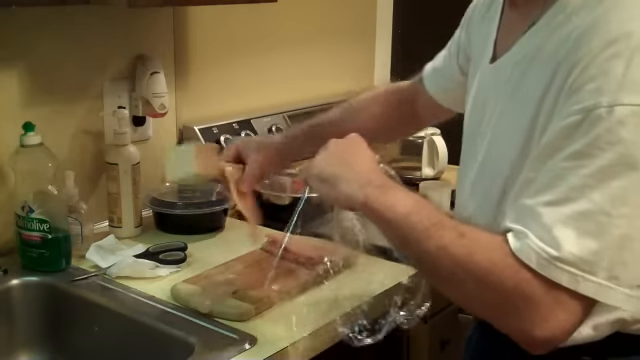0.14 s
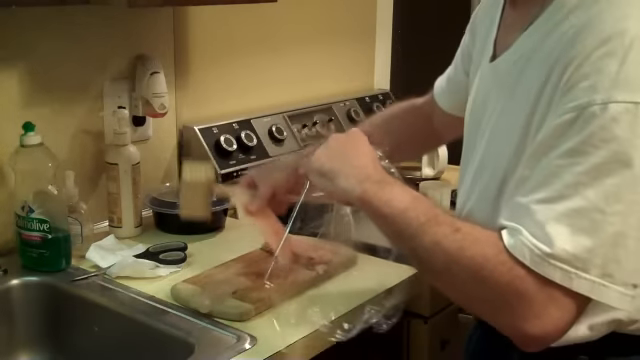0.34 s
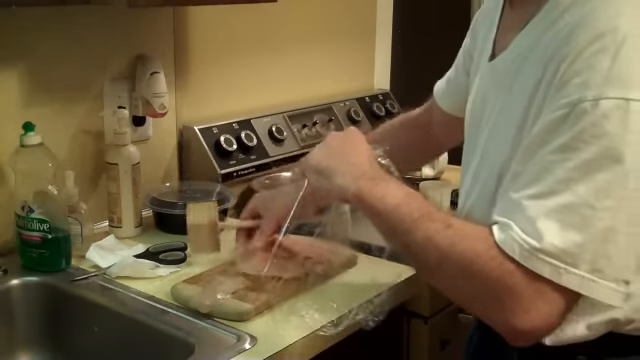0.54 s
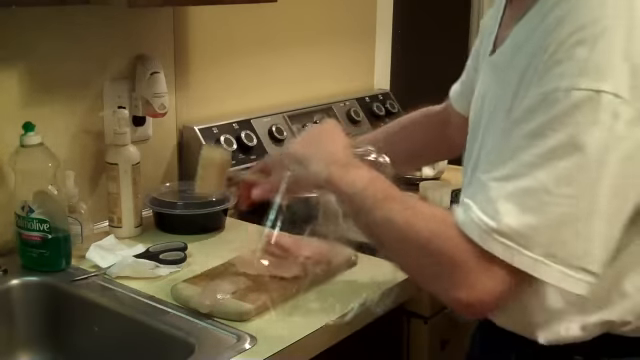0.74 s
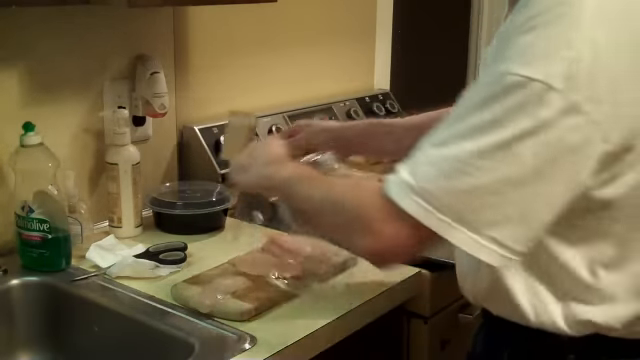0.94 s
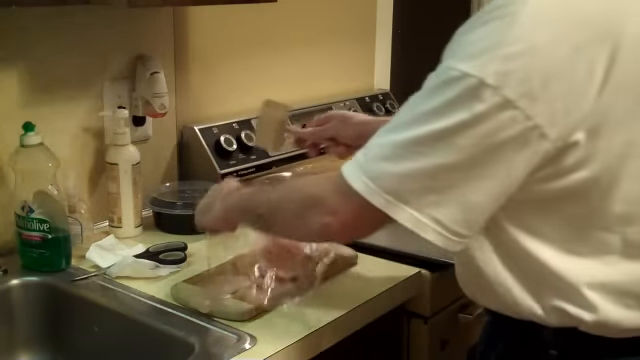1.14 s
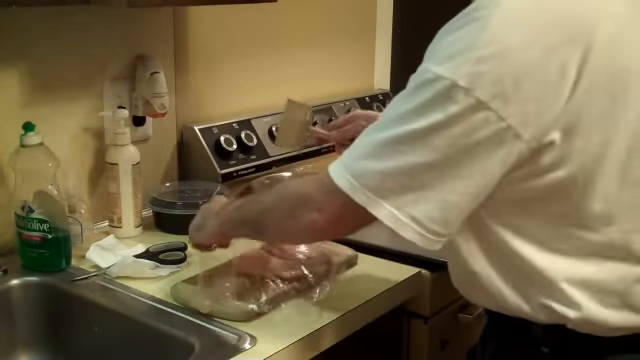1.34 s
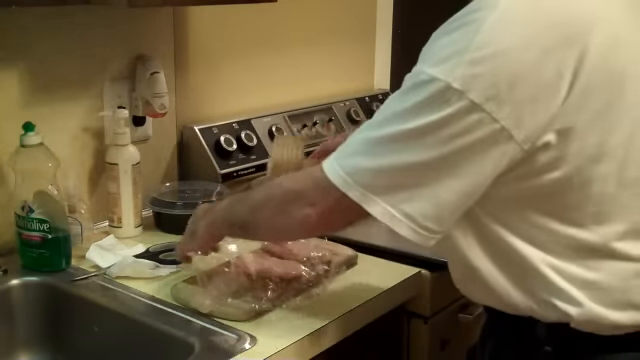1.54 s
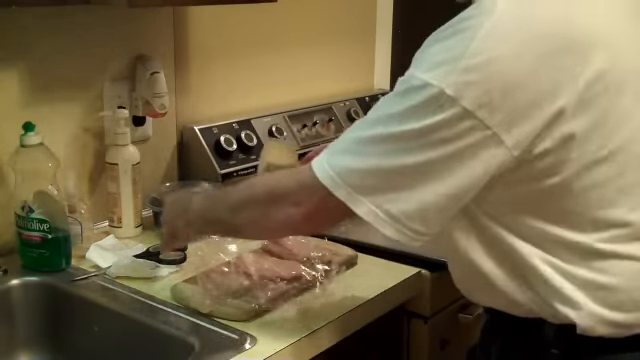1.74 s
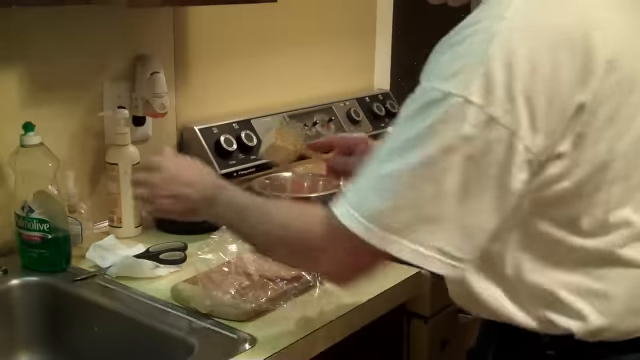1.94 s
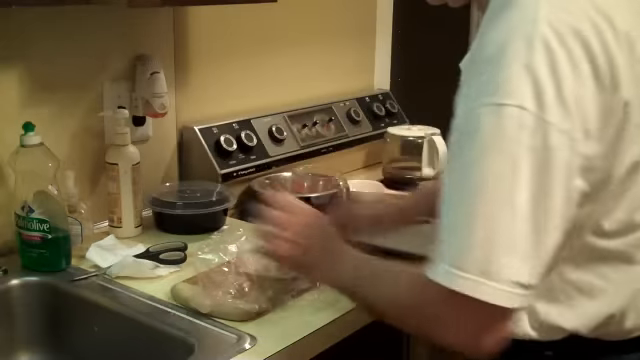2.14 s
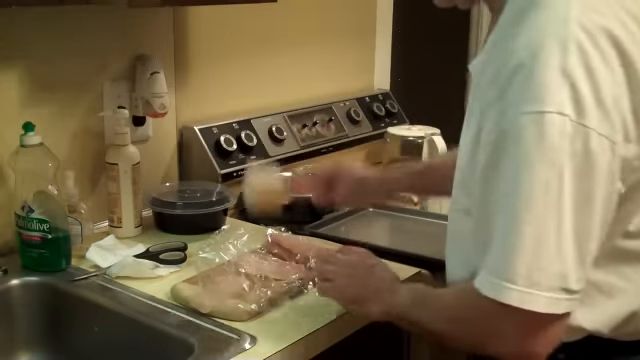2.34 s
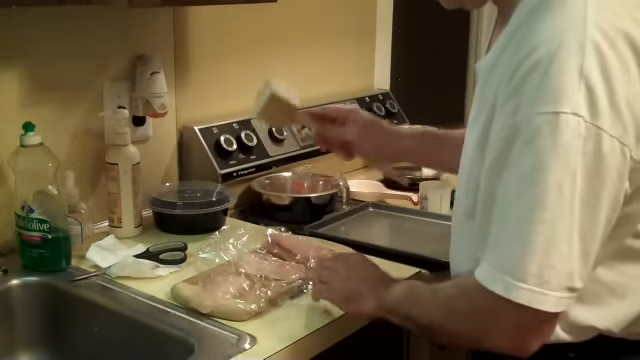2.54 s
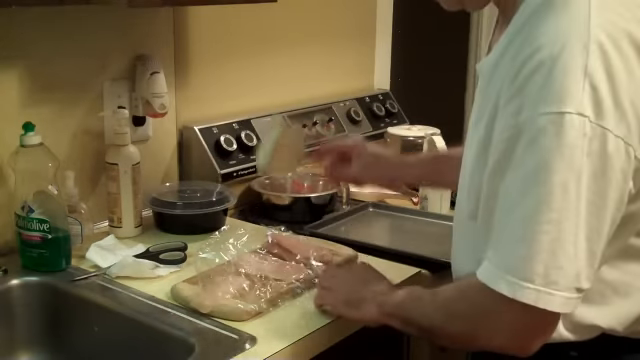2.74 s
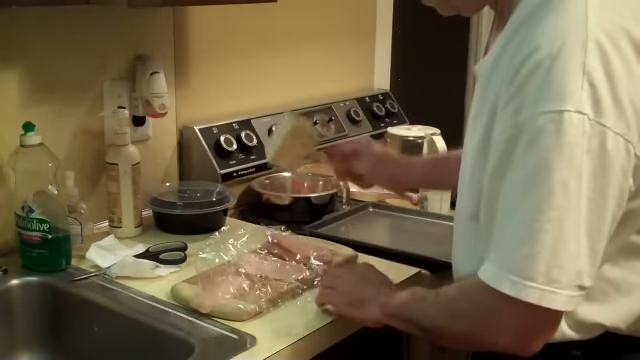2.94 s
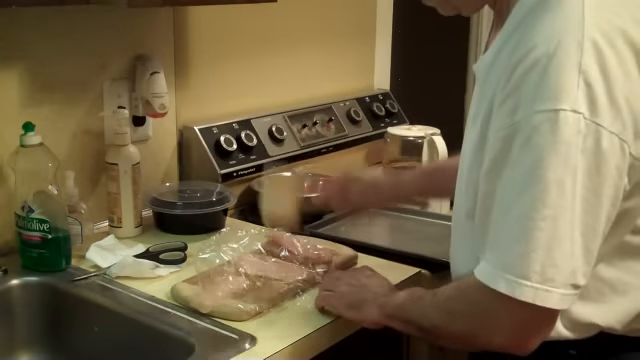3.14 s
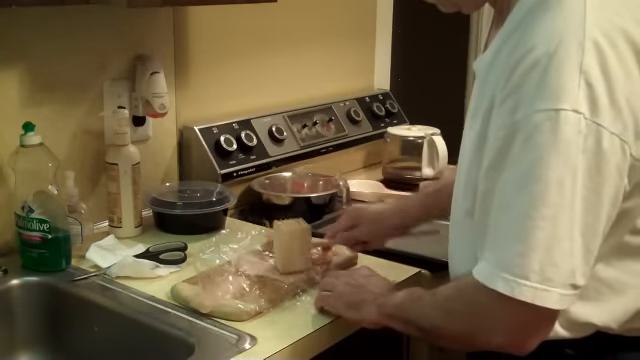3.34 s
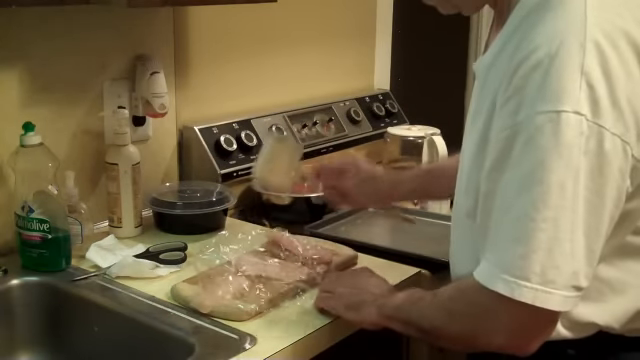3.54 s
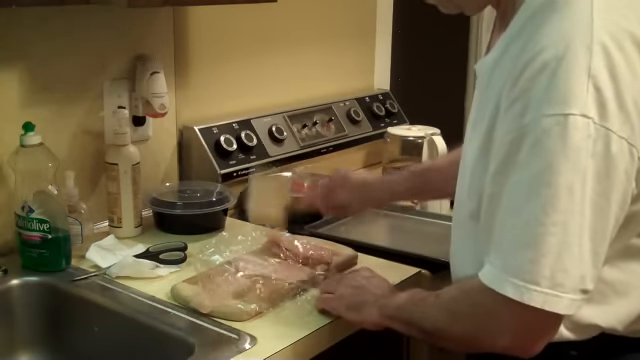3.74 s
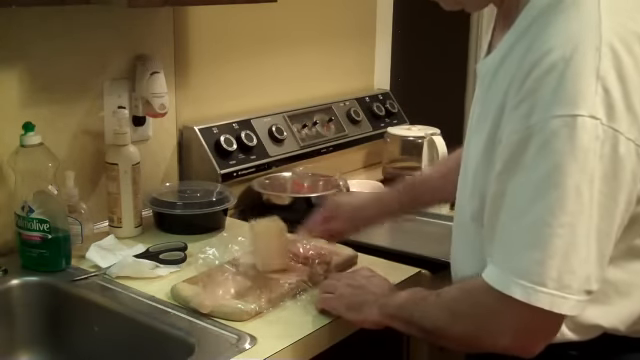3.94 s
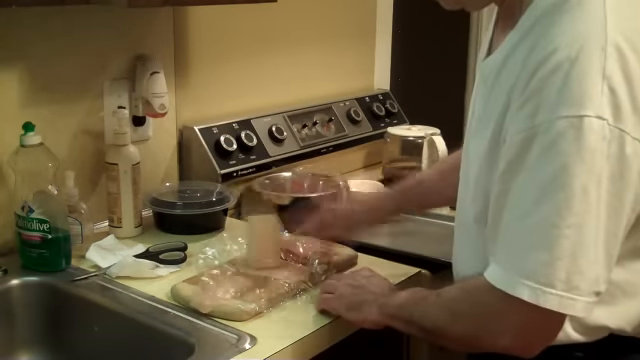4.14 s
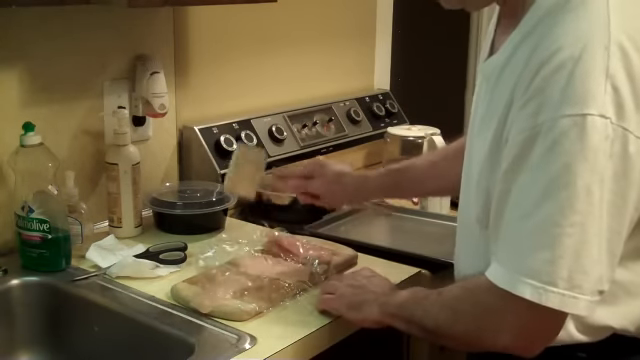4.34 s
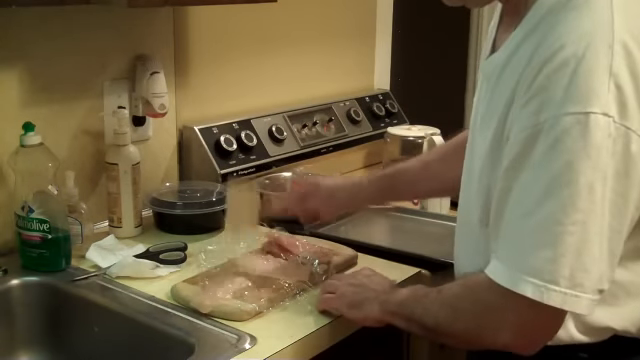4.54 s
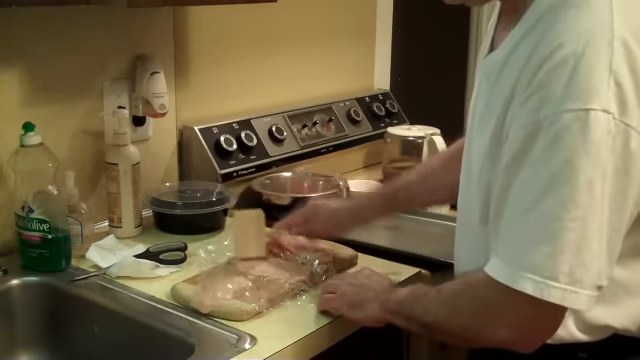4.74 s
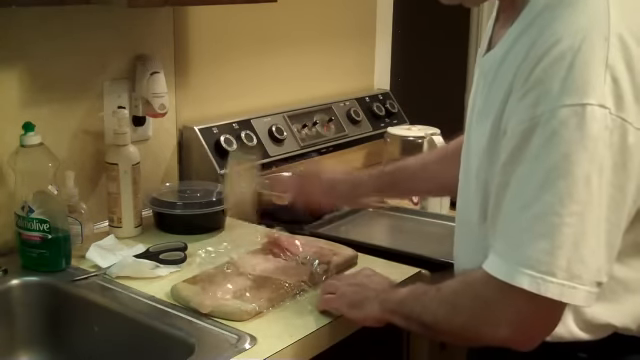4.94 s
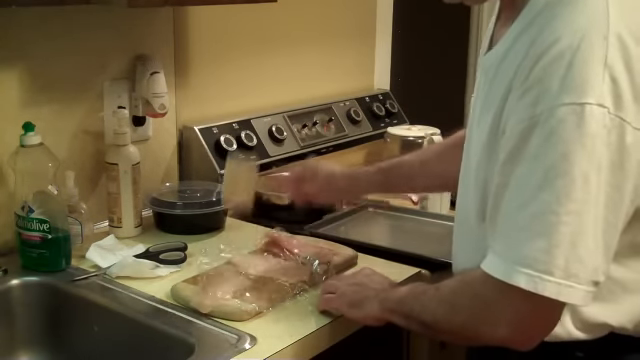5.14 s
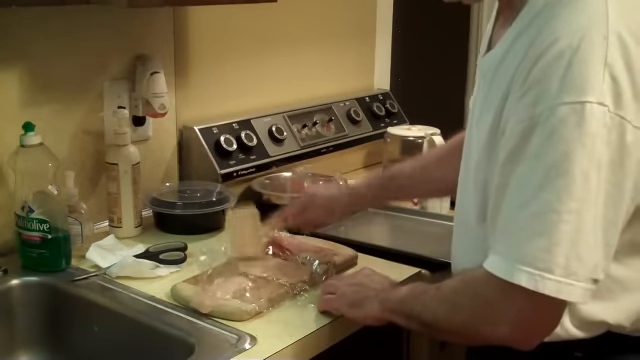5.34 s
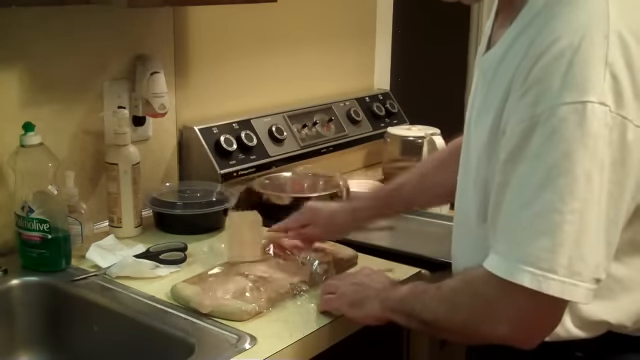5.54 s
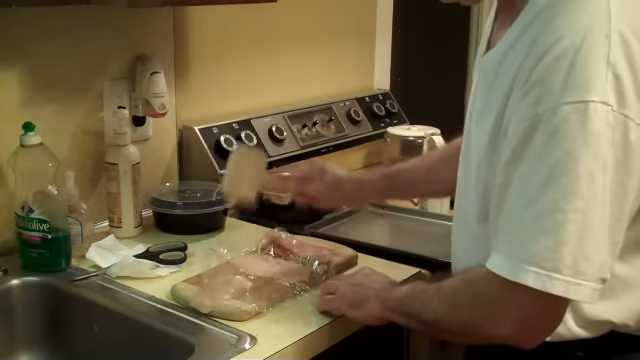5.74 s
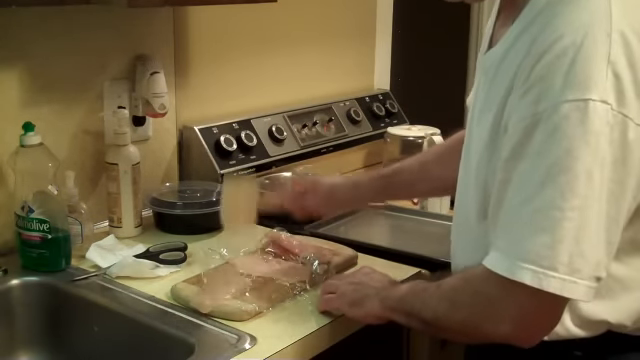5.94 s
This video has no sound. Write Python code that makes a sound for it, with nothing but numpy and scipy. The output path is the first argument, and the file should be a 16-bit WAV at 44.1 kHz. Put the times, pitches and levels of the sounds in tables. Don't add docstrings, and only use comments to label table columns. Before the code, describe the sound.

In a small kitchen with faint hiss and fridge hum, plastic film rustles quietly for about two seconds. One softer mallet blow and a board bump follow, then more crinkling. From three seconds, loud flat thwacks on wrapped meat and wood come in a quick steady rhythm to the end. Close, dull-topped small camera sound with short room reflections.

```python
import sys
import numpy as np
from scipy import signal
from scipy.fft import rfft, irfft
from scipy.io import wavfile
from scipy.ndimage import uniform_filter1d

SR = 44100
rng = np.random.default_rng(int(sys.argv[2]) if len(sys.argv) > 2 else 0)


def generate_wav(signal):
    frames = np.transpose(np.atleast_2d(signal))
    scaled = np.clip(frames, -1, 1) * 32767
    pcm = np.round(scaled).astype(np.int16)
    wavfile.write(sys.argv[1], SR, pcm)


def volts_from_decibels(level):
    exponent = np.asarray(level, float) / 20
    return 10 ** exponent


N = 264600


def evened(x):
    return x / np.sqrt(np.mean(x ** 2) + 1e-20)


def peaked(x):
    return x / abs(x).max()


def read(points, hz):
    f, value = np.transpose(points)
    return np.interp(np.log(hz + 1), np.log(f + 1), value)


def coloured(x, points):
    hz = np.fft.rfftfreq(len(x), 1 / SR)
    return irfft(rfft(x) * volts_from_decibels(read(points, hz)), len(x))


def add(mix, s, sound):
    part = mix[round(s * SR):][:len(sound)]
    part += sound[:len(part)]


# frequency in Hz, level in dB per Hz.
AIR = [(20, -13.5), (45, -4.5), (100, -6.5), (600, -8.5), (3500, -13.5), (4300, -17), (5500, -15.5),
       (7500, -21.5)]
# centre in Hz, width in Hz, level in dB.
HUM = [(73, 10, -70), (118.4, 5, -71), (603, 8, -78)]
AIR_DB = -53.5


def air():
    hz = np.fft.rfftfreq(N, 1 / SR)
    out = volts_from_decibels(AIR_DB) * evened(coloured(rng.standard_normal(N), AIR))
    for centre_hz, width_hz, db in HUM:
        resonance = 1 / (1 + ((hz - centre_hz) / width_hz) ** 2)
        out = out + volts_from_decibels(db) * evened(irfft(rfft(rng.standard_normal(N)) * resonance, N))
    return out


# strongest pull in seconds, level in dB, length in seconds.
TUGS = [
    (0.6, -66, 0.013),
    (1.342, -54.5, 0.18),
    (1.495, -58, 0.11),
    (2.665, -63.5, .08),
    (2.748, -54.5, 0.11),
    (2.961, -57.5, .07),
]
# frequency in Hz, level in dB.
FILM = [(500, -30.5), (1500, -17), (3000, -6), (4000, -7), (4800, 0.5), (6000, -0.5), (7500, -9.5)]
FILM_LIFTED_S, FILM_IDLE_DB, TUG_EDGE_DB = 0.32, -66.5, -10
SNAPS_PER_S = 2500


def film():
    t = np.arange(N) / SR
    level = volts_from_decibels(FILM_IDLE_DB) * np.clip((t - FILM_LIFTED_S) / 0.16 + .2, .2, 1)
    for s, db, length_s in TUGS:
        level = level + volts_from_decibels(db + TUG_EDGE_DB * (2 * (t - s) / length_s) ** 2)
    sizes = volts_from_decibels(2.5 * np.minimum(rng.exponential(1, N), 4)) * rng.standard_normal(N)
    snaps = sizes * (rng.random(N) < SNAPS_PER_S / SR)
    blur = rng.standard_normal(3000) * volts_from_decibels(-60 * np.arange(3000) / SR / 0.1)
    rustle = signal.oaconvolve(snaps, blur)[:N]
    return evened(coloured(rustle, FILM)) * level * volts_from_decibels(0.5)


# frequency in Hz, level in dB.
SLAP = [(300, -31), (900, -12.5), (2000, 6), (3000, 3), (3900, 7), (4800, 3), (5900, 2.5), (7500, -15.5)]


def slap_colour(bright_db):
    return [(hz, db + bright_db * np.log2(max(hz, 1500) / 3500)) for hz, db in SLAP]


def film_slap(t, colour):
    slap = coloured(rng.standard_normal(len(t)), colour)
    return peaked(slap * np.exp(-t / 0.0025) * (1 - np.exp(-t / 0.00074)))


# frequency in Hz, level in dB.
KNOCK = [(30, -15.5), (120, 0), (250, 1), (500, -1), (900, -7.5), (1600, -16.5), (3000, -26)]


def mallet_knock(t):
    knock = coloured(rng.standard_normal(len(t)), KNOCK)
    return peaked(knock * np.exp(-t / 0.0089) * (1 - np.exp(-t / .0015)))


def ring(modes, t, rise_s, spread_db):
    hz, db, t60 = np.transpose(modes)[:, :, None]
    luck = rng.standard_normal((len(modes), 1))
    decay = volts_from_decibels(db + spread_db * luck - 60 * t / t60)
    lines = decay * np.sin(2 * np.pi * hz * (1 + 0.0039 * luck) * t)
    return peaked(lines.sum(0) * (1 - np.exp(-t / rise_s)))


# frequency in Hz, level in dB, decay time t60 in seconds.
BOARD = [(303.2, -4.5, 0.22), (358.5, -1.5, 0.3), (398.6, 2, 0.23), (488.5, -2.5, 0.35), (607.5, -1.5, .25),
         (746, -1.5, 0.18), (944, -7, 0.28), (1096, -0.5, 0.12)]


def board_ring(t):
    return ring(BOARD, t, rise_s=.004, spread_db=2.5)


# frequency in Hz, level in dB, decay time t60 in seconds.
CABINET = [(44.8, -18, .4), (62.64, -14.5, 0.28), (104.3, -11, 0.28), (152.46, 1.5, .2), (158.5, -10.5, .5)]


def cabinet_thud(t):
    return ring(CABINET, t, rise_s=0.0055, spread_db=1.0)


# frequency in Hz, level in dB, decay time t60 in seconds.
COUNTER = [(210, -4.5, 0.16), (355.3, -8.5, .18)]


def counter_thud(t):
    return ring(COUNTER, t, rise_s=.06, spread_db=2.0) * np.minimum(t / .06, 1) ** 2


# delay in seconds, level in dB.
ECHOES = [(.0034, -2), (.0061, -9), (.0098, -12), (0.015, -7.5), (0.0197, -15)]


def early_echoes(heard, dry):
    for delay_s, db in ECHOES:
        add(heard, delay_s, volts_from_decibels(db) * dry)


# frequency in Hz, decay time t60 in seconds.
KITCHEN = [(60, 0.57), (160, 0.62), (420, 0.38), (1100, 0.39), (2910, 0.4), (7680, 0.35)]


def room_tail(shared):
    noise = .75 * shared + .65 * rng.standard_normal(len(shared))
    hz, t, z = signal.stft(noise, SR, nperseg=512)
    decay = volts_from_decibels(-60 * t / read(KITCHEN, hz)[:, None])
    tail = signal.istft(z * decay, SR, nperseg=512)[1][:len(shared)]
    tail = tail * (1 - np.exp(-np.arange(len(tail)) / SR / 0.0033))
    return tail / np.linalg.norm(tail)


# frequency in Hz, level in dB.
ROOM_BASS = [(30, -27), (130, -9.5), (260, -5.5), (450, -1), (900, -5), (1600, -12), (3000, -30)]


def strike(mix, shared, s, board_db, cabinet_db, counter_db, slap_db, bright_db):
    t = np.arange(SR // 2) / SR
    colour = slap_colour(bright_db)
    dry = volts_from_decibels(slap_db + 12) * film_slap(t, colour) + volts_from_decibels(-4.5) * mallet_knock(t)
    heard = dry + volts_from_decibels(-10) * board_ring(t)
    early_echoes(heard, dry)
    tail = room_tail(shared)
    heard = heard + volts_from_decibels(slap_db + 2.5) * peaked(coloured(tail, colour))
    heard = heard + volts_from_decibels(-7.5) * peaked(coloured(tail, ROOM_BASS))
    thud = volts_from_decibels(cabinet_db + 3.5) * cabinet_thud(t)
    thud = thud + volts_from_decibels(counter_db + 16) * counter_thud(t)
    fade = signal.windows.tukey(2 * len(t), .2)[len(t):]
    add(mix, s + 0.0016, (volts_from_decibels(board_db - 2) * heard + thud) * fade)


# start in seconds, strength in dB, #
# thud level in dB, film slap level in dB, slap brightness in dB per octave.
BUMPS = [
    (0.6253, -47.5, -58.5, -41.5, 5.5),
    (1.516, -69, -100, -50.5, 6.5),
    (2.248, -14.5, -33, -30.5, 7),
    (2.665, -69, -82, -52.5, 10),
    (2.757, -65.5, -72, -48, 19),
]
BUMP_COUNTER_DB = -8


def bumps(mix, shared):
    for s, db, thud_db, slap_db, bright_db in BUMPS:
        strike(mix, shared, s, db, thud_db, thud_db + BUMP_COUNTER_DB, slap_db - db, bright_db)


# start in seconds, strength in dB, cabinet thud level in dB,
# counter thud level in dB, slap brightness in dB per octave.
BLOWS = [(2.213, -8, -25, -24.5, 1.5), (3.083, -0.5, -17, -23.5, -2.5), (3.379, 0, -17, -24, -4.5),
         (3.66, 0.5, -18, -23, -4), (3.932, -1, -17.5, -19, -1.32), (4.201, -3.5, -23.5, -23.5, 1),
         (4.47, -1.5, -23, -26.5, -0.5), (4.756, 1, -21.5, -24, -2.5), (5.034, -1, -23.5, -39, -2),
         (5.317, -1, -20.5, -26, -2.5), (5.58, -1, -21.5, -23.5, -4), (5.853, 1, -18.5, -23.5, -4.6)]
SLAP_DB, SLAP_PER_BRIGHT = -13, .4


def blows(mix, shared):
    for s, db, cabinet_db, counter_db, bright_db in BLOWS:
        slap_db = SLAP_DB + SLAP_PER_BRIGHT * bright_db - db
        strike(mix, shared, s, db, cabinet_db, counter_db, slap_db, bright_db)


def scene():
    mix = air() + film()
    shared = rng.standard_normal(SR // 2)
    bumps(mix, shared)
    blows(mix, shared)
    return mix[None]


# frequency in Hz, width in Hz, level in dB.
MICROPHONE_DIPS = [(1550, 80, -3), (2200, 110, -7), (3250, 90, -4), (3750, 170, -8), (4050, 120, -4)]


def microphone(x):
    hz = np.fft.rfftfreq(len(x), 1 / SR)
    dips_db = sum(db / (1 + ((hz - f) / width) ** 2) for f, width, db in MICROPHONE_DIPS)
    return irfft(rfft(x) * volts_from_decibels(dips_db), len(x))


RATE, SHORT, LONG = 16000, 256, 512
LONG_LEAD, SHORT_LEAD, BANDS = 744, 360, 44


def rounded_blocks(x, hop, lead, step_db, whim_db, patch_db, edge_hz):
    n, k = np.arange(2 * hop), np.arange(hop)
    hz = (k + .5) * RATE / 2 / hop
    window = np.sin(np.pi * (n + .5) / 2 / hop)[:, None]
    basis = window * np.cos(np.pi / hop * np.outer(n + .5 + hop / 2, k + .5))
    padded = np.pad(x, (lead, 3 * hop))
    c = np.lib.stride_tricks.sliding_window_view(padded, 2 * hop)[::hop] @ basis
    band = (BANDS * (k / hop) ** .75).astype(int)
    member = band[:, None] == np.arange(BANDS)
    power = c ** 2 @ member / member.sum(0)
    level = np.sqrt(uniform_filter1d(power, size=9, axis=1) + 1e-18)
    whim = evened(uniform_filter1d(rng.standard_normal(level.shape), size=3, axis=0))
    finer_bass_db = 10 * np.log10(np.clip(np.arange(BANDS) / 20 + .05, 0, 1))
    step = (level * volts_from_decibels(step_db + whim_db * whim + finer_bass_db))[:, band]
    patches = rng.standard_normal(level.shape)[:, band // 3] * (hz > 1500)
    c = np.round(c / step) * step * volts_from_decibels(patch_db * patches) * (hz < edge_hz)
    blocks = c @ basis.T * 2 / hop
    return (blocks[:-1, hop:] + blocks[1:, :hop]).ravel()[lead - hop:][:len(x)]


def near_impacts(t):
    near = np.zeros(len(t))
    for row in BLOWS + BUMPS:
        hold_s = .17 if row[1] > -20 else .05
        rise, fall = (t - row[0] + .07) / .03, (row[0] + hold_s - t) / .03
        near += np.clip(np.minimum(rise, fall), 0, 1)
    return np.sin(np.pi / 2 * np.minimum(near, 1)) ** 2


FILL_DB, FILL_SLOPE, FILL_WHIM_DB = -4, 1.2, 0.5
FILL_BAR_CALM, FILL_BAR_BUSY, QUIET_DB, TAUT_DB = -.1, .55, -58, -1


def top_band(stored):
    hz, t = np.fft.rfftfreq(len(stored), 1 / RATE), np.arange(0, len(stored), SHORT) / RATE
    treble = irfft(rfft(stored) * (hz > 5000), len(stored))
    treble_db = 10 * np.log10(abs(uniform_filter1d(treble ** 2, size=400))[::SHORT] + 1e-12)
    whim, size = rng.standard_normal((len(t), 2)).T
    long_spells = evened(uniform_filter1d(whim, size=4)) > FILL_BAR_CALM
    short_spells = evened(uniform_filter1d(whim, size=2)) > FILL_BAR_BUSY
    on = np.where(treble_db < QUIET_DB, long_spells, short_spells)
    for row in BLOWS:
        on = np.where(abs(t - row[0]) < .02, row[-1] < TAUT_DB, on)
    gate = on * volts_from_decibels(FILL_DB + FILL_SLOPE * (treble_db + 31) - 28.5 + FILL_WHIM_DB * size)
    gate = np.roll(np.repeat(gate, SHORT), -SHORT // 2)[:len(stored)]
    noise = irfft(rfft(rng.standard_normal(len(stored))) * ((hz > 6400) & (hz < 7330)), len(stored))
    return evened(noise) * uniform_filter1d(gate, size=70)


# frequency in Hz, level in dB.
HAZE = [(6200, -45.5), (6500, 3.5), (7600, -3), (8200, -8.5), (9200, -59)]


def haze(full):
    treble = np.sqrt(abs(uniform_filter1d(np.diff(full, prepend=0) ** 2, size=1400)))
    colour = [(1, -120)] + HAZE + [(12000, -120)]
    return volts_from_decibels(-21.5) * treble ** 1.07 * evened(coloured(rng.standard_normal(N), colour))


# time in seconds, level in dB.
OVERLOADS = [(2.2150, -54.5), (3.0881, -25), (3.09, -25.5), (3.093, -36.5), (3.666, -41), (3.939, -43),
             (4.476, -50), (5.3223, -39.5), (5.589, -49.5), (5.5943, -36.5), (5.857, -39)]


def ticks():
    out = np.zeros(N)
    for s, db in OVERLOADS:
        add(out, s, volts_from_decibels(db + 12.0) * np.array([.7, 0, -.7]))
    return out


def roll_off(x):
    return signal.sosfilt(signal.butter(12, 16080, fs=SR, output="sos"), x)


CEILING = .85


def record(dry):
    limited = CEILING * np.tanh(microphone(dry[0]) / CEILING)
    low = signal.resample_poly(limited, 160, 441)
    calm = rounded_blocks(low, LONG, LONG_LEAD, step_db=6.0, whim_db=3.0, patch_db=1.8, edge_hz=6400)
    busy = rounded_blocks(low, SHORT, SHORT_LEAD, step_db=6.0, whim_db=2.0, patch_db=2.2, edge_hz=6280)
    share = near_impacts(np.arange(len(low)) / RATE)
    stored = share * busy + (1 - share) * calm
    stored = stored + top_band(stored)
    full = signal.resample_poly(stored, 441, 160, window=("kaiser", 5.0))[:N]
    full = full + haze(full)
    return roll_off((full + ticks())[None])


dry = scene()
out = record(dry)
generate_wav(out)
```